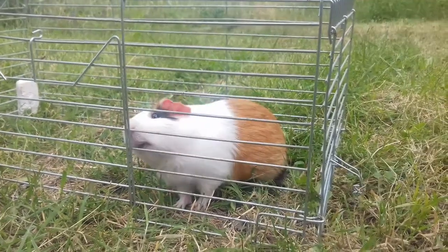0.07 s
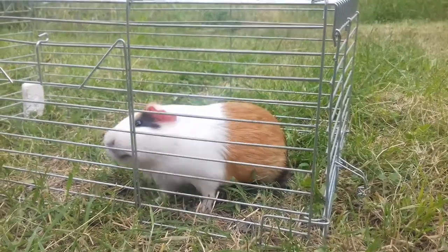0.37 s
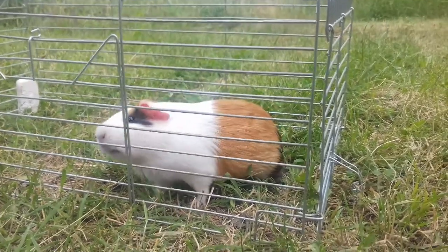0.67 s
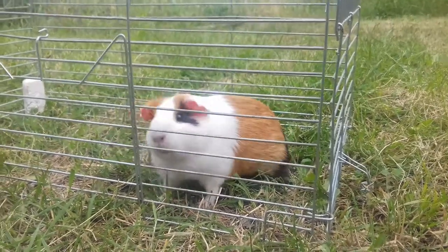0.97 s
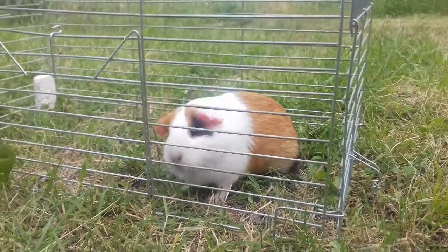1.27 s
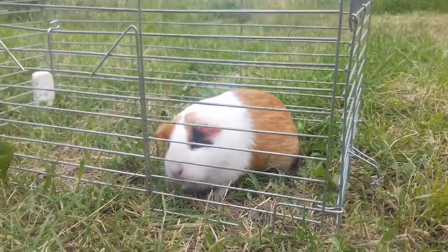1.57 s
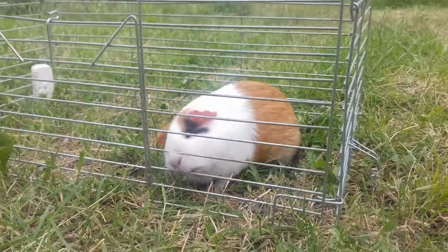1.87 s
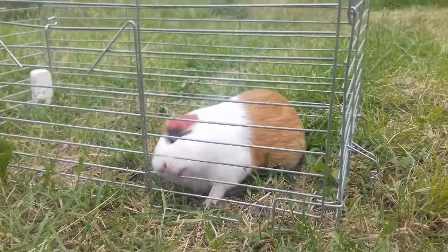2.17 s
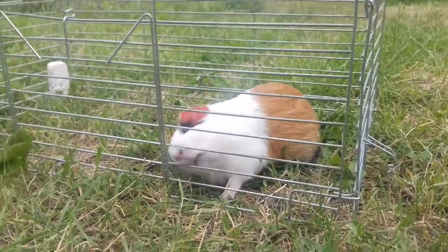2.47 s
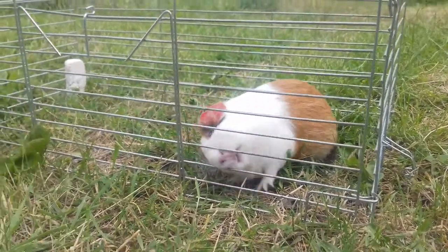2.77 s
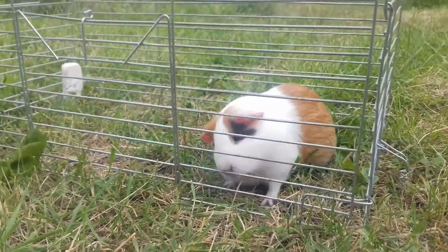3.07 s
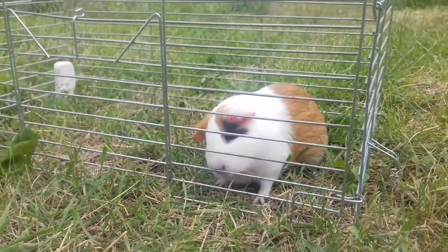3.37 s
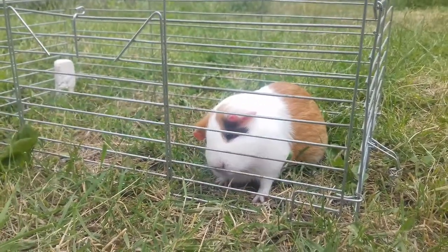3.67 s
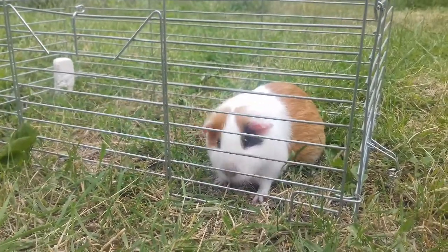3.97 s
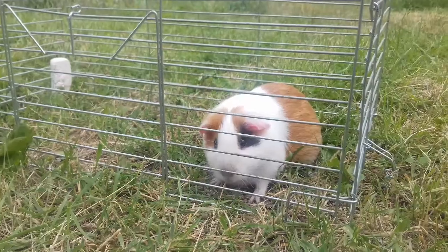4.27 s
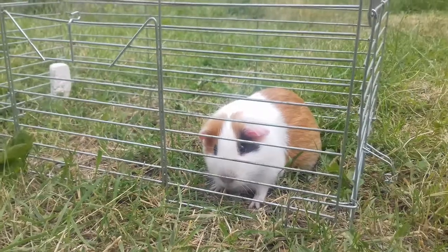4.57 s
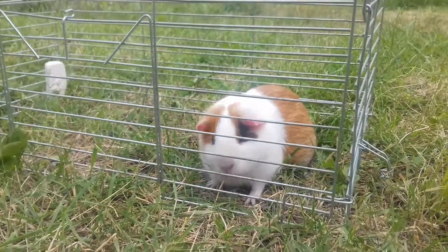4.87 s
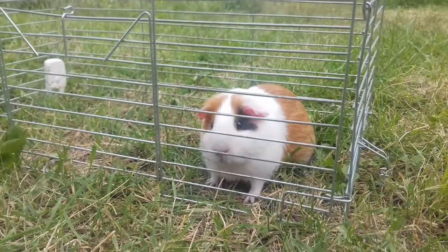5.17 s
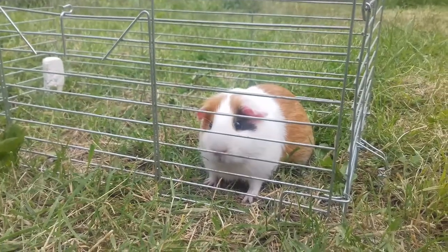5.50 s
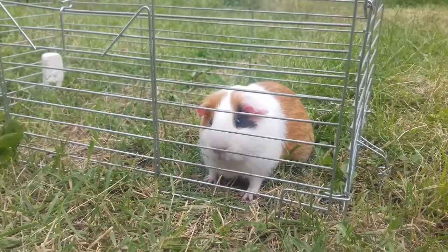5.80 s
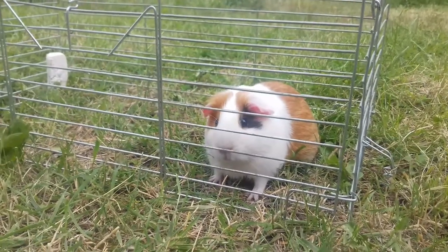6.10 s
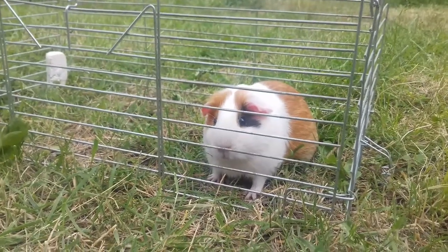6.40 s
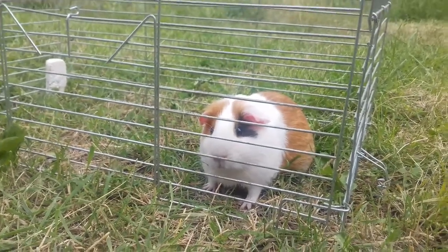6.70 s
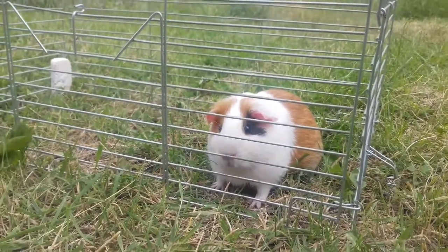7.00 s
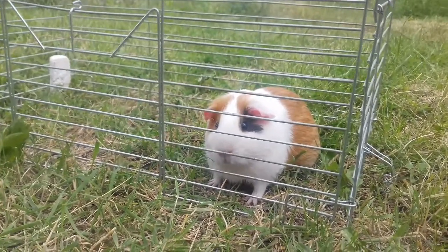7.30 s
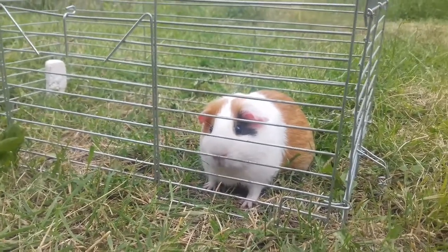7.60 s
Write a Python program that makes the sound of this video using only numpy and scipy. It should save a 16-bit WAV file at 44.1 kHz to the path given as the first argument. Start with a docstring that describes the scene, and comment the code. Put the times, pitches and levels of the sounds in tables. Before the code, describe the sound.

Wind blows across a lawn and buffets a microphone held low, making uneven low rumbles and soft thumps, strongest in the first two seconds. Behind it, a faint hiss of foliage swells and fades over a distant rumble. About three seconds in, a small animal pen gives a short dull rattle, then a few faint ticks. The wind eases, and very faint distant bird calls come near the end.

```python
"""Foliage hisses over a distant rumble, swelling and dying away with one long gust across a lawn.
Countless leaf touches make the hiss; puffs of wind stir the grass and buffet a microphone held low,
and single eddies thump softly as they cross it. Light contacts on a small hollow body give a short
dull rattle and a few faint ticks. In the lull, a few faint calls arrive, blurred by distance."""
import sys
import numpy as np
from scipy import signal
from scipy.fft import rfft, irfft
from scipy.io import wavfile
from scipy.ndimage import uniform_filter1d, map_coordinates

SR = 44100
rng = np.random.default_rng(int(sys.argv[2]) if len(sys.argv) > 2 else 0)


def store_wav(level_fs):
    """Save 16-bit WAV to argv[1]."""
    pcm = np.round(np.clip(np.atleast_2d(level_fs), -1, 1) * 32767)
    wavfile.write(sys.argv[1], SR, pcm.T.astype(np.int16))


N = 346185
TIME = np.arange(N) / SR
BIN_HZ = np.fft.rfftfreq(N, 1 / SR)

# Stereo image of the air. Each row: frequency in Hz, left-right likeness from 0 to 1.
STEREO_LIKENESS = [(100, 1), (300, 0.99), (700, 0.96), (2500, 0.96), (4000, 0.98), (5200, 1), (7000, 0.99),
                   (9000, 0.82), (12000, 0.3)]
# Distant rumble, with microphone hiss on top. Each row: frequency in Hz, gain in dB.
RUMBLE_EQ = [(15, -19.5), (45, -11.5), (110, -4.5), (220, -1), (350, -5.5), (500, -10), (800, -26),
             (1600, -36.5), (4000, -28.5), (9000, -43.5), (15000, -51.5)]
# Air rushing in far trees. Each row: time in seconds, level in dB.
FAR_TREES_LEVEL = [(0, -72.5), (.5, -83), (1.6, -74), (2.6, -83), (3.4, -72), (4.0, -84), (5.4, -74.5),
                   (6.4, -70.5), (6.9, -74), (7.3, -77.5), (7.85, -81)]
# Tone of that rush. Each row: frequency in Hz, gain in dB.
FAR_TREES_EQ = [(200, -14.5), (500, 2), (900, -10.5), (1280, 1.5), (1650, -5), (2100, -3), (2650, -9),
                (4000, -6.5), (6500, -29), (10000, -54)]
# One low hoot, then chirps. Each row: centre in seconds, nominal length in seconds, level in dB,
# pitch in Hz, resonance width in Hz.
FAR_CALLS = [(5.435, 0.056, -63.5, 602, 278.4), (5.559, .07, -70, 3020, 450), (6.257, .05, -67, 1986, 350),
             (6.294, 0.053, -67, 2100, 219.6)]
# Dull ticks and knocks. Each row: start in seconds, relative level in dB, decay time in seconds,
# share of ringing from 0 to 1.
CONTACTS = [(2.986, -47, 0.0048, 1), (2.993, -43, 0.0046, 0.6), (3.004, -34, 0.003, 0.95),
            (3.010, -47, 0.0078, 0.9), (3.019, -44.5, 0.022, 0), (3.055, -51, 0.061, 0.1),
            (3.213, -46, 0.012, 0.06), (3.231, -47, 0.0075, 0.08), (4.222, -43.5, 0.006, 0.06),
            (4.404, -47, 0.0019, 0.31)]
# Ring of the hollow body. Each row: frequency in Hz, width in Hz, gain in dB.
BODY_MODES = [(614, 47.2, 10), (1620, 69, 3.5), (2200, 185, -22), (3402, 140, -18)]
# Dry scuff of a contact. Each row: frequency in Hz, gain in dB.
SCUFF_EQ = [(150, 5), (500, 7), (1100, -7), (2200, -6.5), (5000, -18), (7000, -34), (12000, -60)]
# The long gust, heard as foliage hiss. Each row: time in seconds, level in dB.
BREEZE_LEVEL = [(0, -68), (.45, -66.5), (.85, -62.5), (1.8, -58.5), (2.2, -61), (3.05, -63), (3.8, -66.5),
                (4.7, -67.5), (5.4, -67), (6.3, -69.5), (7.85, -72)]
# Foliage hiss coloured by ground reflection, early on. Each row: frequency in Hz, gain in dB.
EARLY_HISS_EQ = [(550, -1.5), (900, -2), (1300, -10.5), (1750, -3), (2050, -7), (2300, -4.5), (2950, -9),
                 (3750, -6.5), (4200, -4), (5150, 1), (6050, -2.5), (6700, -13), (8500, -27.5),
                 (15000, -47)]
# The same hiss later, its notches shifted. Each row: frequency in Hz, gain in dB.
LATE_HISS_EQ = [(550, -0.5), (900, -4.5), (1250, -4.5), (1650, -4), (2200, -3.5), (2650, -10.5),
                (3050, -6.5), (3350, -8.5), (4000, -4.5), (4600, -4.5), (5200, -0.5), (5900, -6),
                (6900, -19), (8500, -35.5)]
# The notches shift as the microphone's height changes.
# Each row: time in seconds, early tone's share of the crossfade from 0 to 1.
HEIGHT_CROSSFADE = [(0, 0.48), (1.0, 0.92), (2.0, 0.93), (3.1, 0.79), (3.8, 0.3), (5.0, 0.04), (7.85, 0.01)]
# Leaf flicks close by. Each row: start in seconds, relative level in dB.
LEAF_FLICKS = [(3.02, -71), (5.195, -64.5)]
# Puffs reaching the microphone. Each row: start of hold in seconds, hold in seconds, strength in dB.
WIND_PUFFS = [(0.281, .04, -58), (0.531, 0.11, -55), (0.633, 0.062, -47), (0.732, 0.078, -38),
              (0.861, 0.12, -44), (1.023, 0.039, -44), (1.17, 0.089, -40), (1.309, 0.098, -37),
              (1.427, 0.14, -47), (1.587, .09, -40), (1.717, .12, -38), (1.891, 0.041, -37.5),
              (2.29, 0.12, -45), (2.48, 0.049, -45), (2.68, .02, -52), (2.799, .11, -54),
              (3.03, 0.0605, -46), (3.431, 0.063, -48), (3.632, .05, -47), (3.971, 0.15, -47.5),
              (4.17, 0.26, -53), (4.476, 0.099, -53), (4.881, 0.017, -48), (4.96, .16, -46.5),
              (5.184, 0.042, -46), (5.349, .06, -58), (5.494, 0.091, -42.5), (6.34, 0.027, -57.5),
              (6.928, 0.051, -57), (7.049, 0.019, -55.5)]
# Tone of the buffeting at the usual wind strength. Each row: frequency in Hz, gain in dB.
BUFFET_EQ = [(12, -32.5), (25, -10.5), (60, 3.5), (120, 3.5), (180, -6.5), (260, -17), (350, -25),
             (500, -40), (900, -50), (2000, -90)]
# Strong single eddies. Each row: centre in seconds, swirl level in dB, nominal pitch in Hz.
EDDY_THUMPS = [(0.595, -35, 112), (0.726, -28, 168), (0.744, -26.5, 207), (0.76, -25.5, 204),
               (0.771, -15, 131), (0.866, -32.5, 205), (0.885, -31, 209), (0.937, -32, 122),
               (1.025, -31.5, 159.5), (1.222, -28.5, 124), (1.322, -28, 133.5), (1.404, -30.5, 171),
               (1.603, -27.5, 158), (1.655, -32, 92), (1.717, -28.5, 151), (1.823, -18, 170),
               (1.885, -20.5, 120.8), (1.927, -30, 200), (2.371, -35.5, 159.8), (3.032, -33.5, 122),
               (3.061, -38.5, 235), (3.066, -33, 101.2), (3.093, -37.5, 138), (3.433, -36, 104.2),
               (4.364, -31, 109), (5.026, -30, 104.8), (5.07, -34.5, 148.9), (5.219, -24.5, 138),
               (5.58, -30.5, 141)]


def amp(db):
    """Decibels to gain."""
    return 10 ** (np.asarray(db) / 20)


def unit(x):
    """Scales to rms 1."""
    return x / np.sqrt(np.mean(x ** 2) + 1e-30)


def automation(rows):
    """Joins (seconds, value) rows by straight lines."""
    return np.interp(TIME, *np.transpose(rows))


def at_hz(rows, hz):
    """Joins (Hz, value) rows on a log-frequency axis."""
    row_hz, value = np.transpose(rows)
    return np.interp(np.log(hz + 1), np.log(row_hz + 1), value)


def add(mix, start_s, sound):
    """Drops a sound into the mix."""
    part = mix[max(round(start_s * SR), 0):][:len(sound)]
    part += sound[:len(part)]


def equalise(x, eq):
    """Shapes a signal with an EQ table."""
    hz = np.fft.rfftfreq(x.shape[-1], 1 / SR)
    return irfft(rfft(x) * amp(at_hz(eq, hz)), x.shape[-1])


def drift(rate_hz):
    """Random wobble of rms 1, up to about the given rate."""
    return unit(irfft(rfft(rng.standard_normal(N)) * np.exp(-(BIN_HZ / rate_hz) ** 2), N))


def resonate(x, hz, width_hz):
    """One resonance, with a peak gain near 1."""
    radius = np.exp(-np.pi * width_hz / SR)
    pole = radius * np.exp(2j * np.pi * hz / SR)
    return 2 * signal.lfilter([1 - radius], [1, -pole], x).real


def air():
    """Noise from all around, as two closely spaced microphone ports hear it."""
    mid, side = rfft(rng.standard_normal((2, N)))
    likeness = np.clip(at_hz(STEREO_LIKENESS, BIN_HZ), 0, 1)
    side = side * np.sqrt((1 - likeness) / (1 + likeness))
    return irfft(np.array([mid + side, mid - side]), N)


def distant_bed(rumble_db=-65, waver_db=-1.2, waver_hz=5):
    """A steady low rumble under the wavering rush of air in far trees."""
    rumble = amp(rumble_db) * unit(equalise(air(), RUMBLE_EQ))
    rush_db = automation(FAR_TREES_LEVEL) + waver_db * drift(waver_hz)
    return rumble + amp(rush_db) * unit(equalise(air(), FAR_TREES_EQ))


def far_calls(stretch=1.5):
    """Distance blurs each short call into a soft, narrow band of noise."""
    out = np.zeros(N)
    for centre_s, length_s, db, hz, width_hz in FAR_CALLS:
        swell = np.hanning(int(stretch * length_s * SR))
        noise = rng.standard_normal(len(swell))
        tone = unit(resonate(resonate(noise, hz, width_hz), hz, width_hz))
        add(out, centre_s - len(swell) / 2 / SR, amp(db) * tone * swell)
    return out


def rattle_and_ticks(trim_db=-7, high_cut_hz=3800, scrape_db=-27, attack_s=0.001):
    """Each contact is a brief scuff and a tap that rings a small hollow body."""
    out, t = np.zeros(N), np.arange(8192) / SR
    for start_s, db, decay_s, ring_share in CONTACTS:
        noise, fade = rng.standard_normal(len(t)), np.exp(-t / decay_s)
        scuff = unit(equalise(noise, SCUFF_EQ)) * fade * np.minimum(t / attack_s, 1)
        tap = (t == 0) + amp(scrape_db) * noise * fade
        ring = sum(amp(mode_db) * resonate(tap, hz, width) for hz, width, mode_db in BODY_MODES)
        contact = np.sqrt(1 - ring_share) * unit(scuff) + np.sqrt(ring_share) * unit(ring)
        fade_rms = np.sqrt(np.mean(fade ** 2))
        add(out, start_s, amp(db + trim_db) * fade_rms * contact)
    # soft contacts carry little treble
    return signal.sosfilt(signal.butter(3, high_cut_hz, fs=SR, output="sos"), out)


def leaf_flicks(rise_s=0.021, decay_s=0.05):
    """Envelope of a close leaf that flicks and settles."""
    out, t = np.zeros(N), np.arange(SR // 2) / SR
    for start_s, db in LEAF_FLICKS:
        add(out, start_s, amp(db) * np.minimum(t / rise_s, 1) * np.exp(-t / decay_s))
    return out


def leaf_hiss(eq, low_cut_hz=420):
    """Countless leaf touches merge into a hiss, scaled to rms 1 in its bright band."""
    spectrum = rfft(equalise(air(), eq)) / np.sqrt(1 + (low_cut_hz / (BIN_HZ + 1)) ** 4)
    bright_band = (BIN_HZ > 3500) & (BIN_HZ < 7000)
    return irfft(spectrum, N) / np.std(irfft(spectrum * bright_band, N))


def foliage(puffs, late_db=-0.4, flutter_db=0.62, flutter_hz=25, grass_db=-27, puff_limit_db=-44):
    """The hiss swells with the gust and flutters; puffs stir the grass close by."""
    # ground-reflection notches shift with the microphone's height
    early_share = automation(HEIGHT_CROSSFADE)
    early = np.sqrt(early_share) * leaf_hiss(EARLY_HISS_EQ)
    late = np.sqrt(1 - early_share) * amp(late_db) * leaf_hiss(LATE_HISS_EQ)
    close_stir = amp(grass_db) * np.minimum(puffs, amp(puff_limit_db)) + leaf_flicks()
    swell = np.hypot(amp(automation(BREEZE_LEVEL)), close_stir)
    return (early + late) * swell * amp(flutter_db * drift(flutter_hz))


def puff_envelope(rise_db_per_s=551, fall_db_per_s=600, wake_db=-17, wake_db_per_s=45.5):
    """Each puff rises quickly, holds, drops away and leaves a wake of weak turbulence."""
    power = np.zeros(N)
    for start_s, hold_s, db in WIND_PUFFS:
        before_s = np.maximum(start_s - TIME, 0)
        after_s = np.maximum(TIME - start_s - hold_s, 0)
        near = (before_s < 0.3) & (after_s < 1)
        attack = amp(db - rise_db_per_s * before_s[near])
        release = amp(-fall_db_per_s * after_s[near])
        wake = amp(wake_db - wake_db_per_s * after_s[near])
        power[near] += attack ** 2 * (release ** 2 + wake ** 2)
    return np.sqrt(power)


def draught_envelope(level_db=-67, tracking=1.108, usual_breeze_db=-66):
    """A light draught follows the breeze and fills the gaps between puffs."""
    return amp(level_db + tracking * (automation(BREEZE_LEVEL) - usual_breeze_db))


def buffeting(puffs, trim_db=-0.04, evenness=0.63, speed_tracking=0.1, usual_db=-48,
              flutter_db=3.5, flutter_hz=35):
    """Turbulence on the ports: lumps of pressure that pass faster when the wind is stronger."""
    wind_db = 20 * np.log10(np.hypot(puffs, draught_envelope()))
    flow = unit(equalise(rng.standard_normal(N), BUFFET_EQ))
    # compress the noise, so the wind sets each lump's force and chance sets its shape
    flow_rms = np.sqrt(abs(uniform_filter1d(flow ** 2, size=1300)) + 1e-6)
    even_flow = flow / flow_rms ** evenness
    speed = amp(speed_tracking * (wind_db - usual_db))
    lumps = map_coordinates(even_flow, [np.cumsum(speed)], order=3, mode="mirror")
    flutter = amp(flutter_db * drift(flutter_hz))
    return amp(wind_db + trim_db) * unit(lumps * flutter)


def eddies(pitch_ratio=0.88, lean=0.21, core_db=-22, core_width=0.33, core_tracking=0.25,
           usual_db=-20, front_db=-27, front_width=0.22):
    """A vortex thumps across the ports: pressure rises, drops in its core and rises again."""
    out, t = np.zeros(N), np.arange(-1100, 1100) / SR
    for centre_s, db, hz in EDDY_THUMPS:
        position = np.pi * hz * pitch_ratio * t
        swirl = (1 - 2 * position ** 2 + 2 * lean * position) * np.exp(-position ** 2)
        # stronger vortices have a deeper tight core; all have a steep front
        in_core, in_front = position / core_width, position / front_width
        core_depth = amp(core_db + core_tracking * (db - usual_db))
        core = core_depth * (1 - 2 * in_core ** 2) * np.exp(-in_core ** 2)
        front = amp(front_db) * 2 * in_front * np.exp(-abs(in_front))
        add(out, centre_s + t[0], -amp(db) * (swirl + core + front))
    return out


def scene():
    """Foliage and distance in narrow stereo; wind thumps and small sounds dead centre."""
    puffs = puff_envelope()
    ambience = foliage(puffs) + distant_bed()
    wind = buffeting(puffs) + eddies()
    return ambience + wind + rattle_and_ticks() + far_calls()


def record(dry, low_cut_hz=32, high_cut_hz=15750):
    """The microphone sheds the deepest bass, and a steep filter trims the very top."""
    thinned = irfft(rfft(dry) * BIN_HZ ** 2 / np.sqrt(BIN_HZ ** 4 + low_cut_hz ** 4), N)
    high_cut = signal.firwin(511, high_cut_hz, window=("kaiser", 9), fs=SR)
    return signal.oaconvolve(thinned, high_cut[None], "same")


dry = scene()
out = record(dry)
store_wav(out)
```